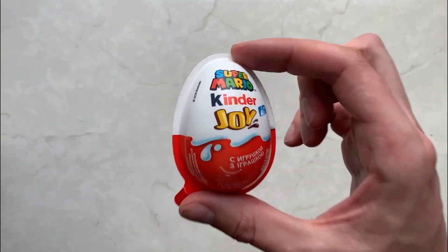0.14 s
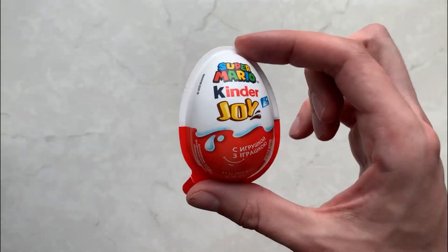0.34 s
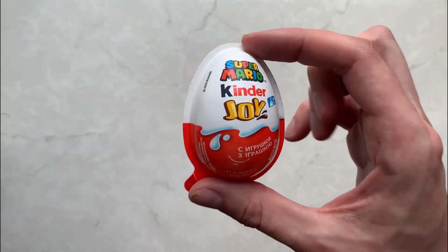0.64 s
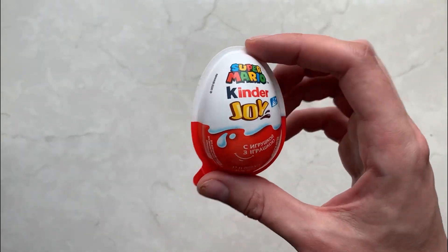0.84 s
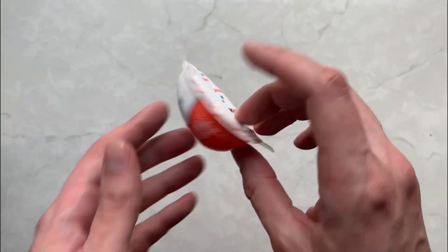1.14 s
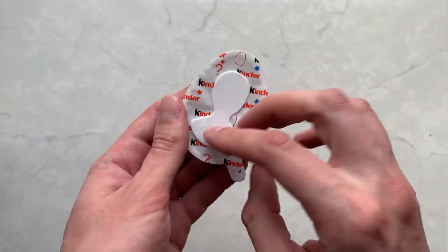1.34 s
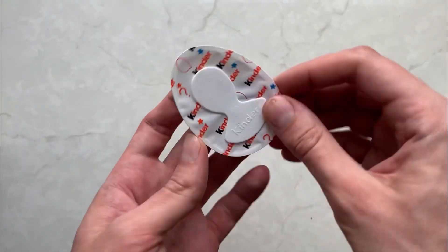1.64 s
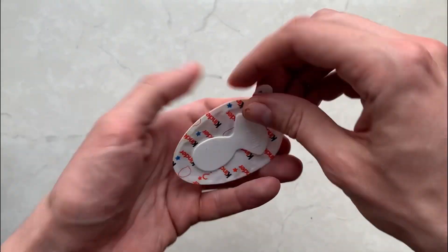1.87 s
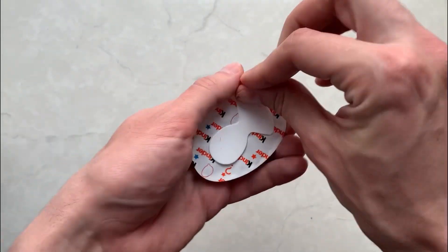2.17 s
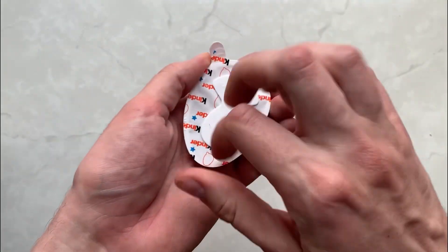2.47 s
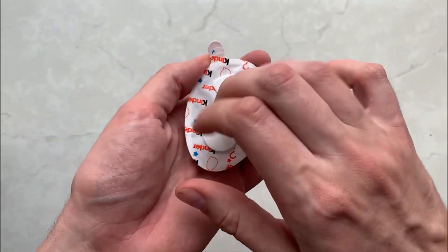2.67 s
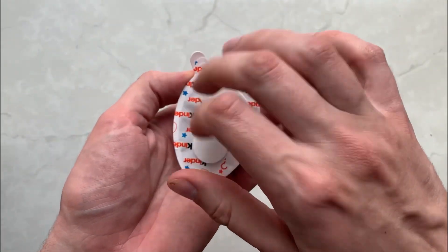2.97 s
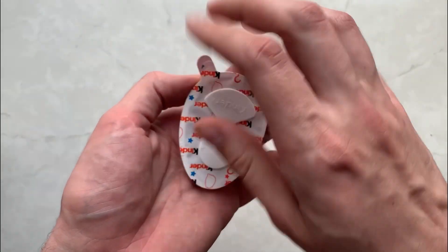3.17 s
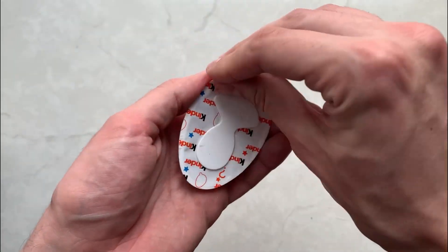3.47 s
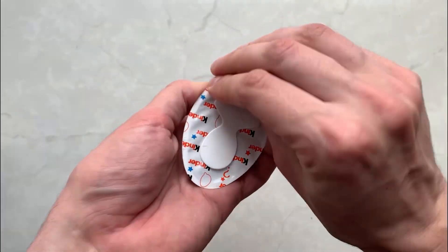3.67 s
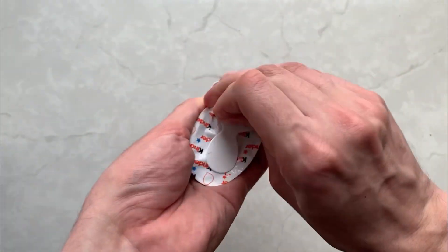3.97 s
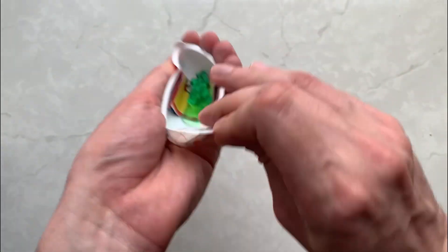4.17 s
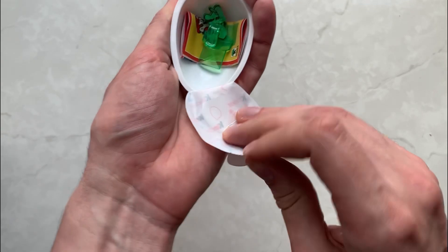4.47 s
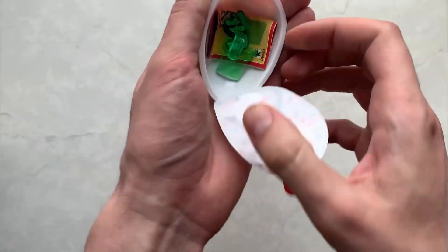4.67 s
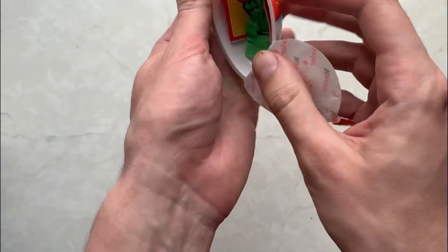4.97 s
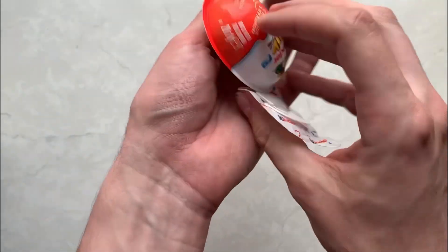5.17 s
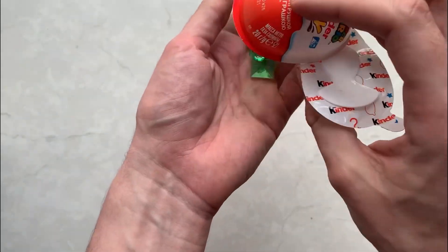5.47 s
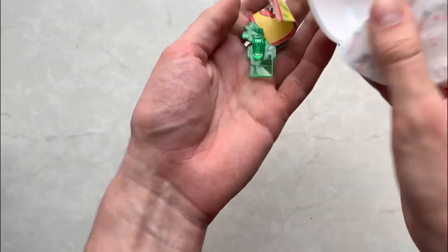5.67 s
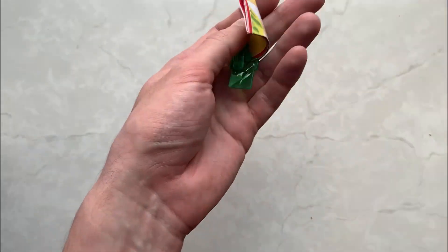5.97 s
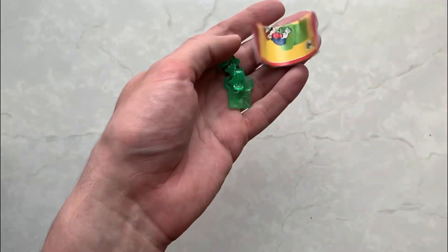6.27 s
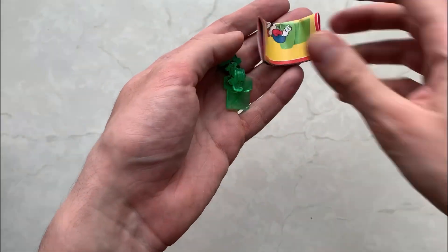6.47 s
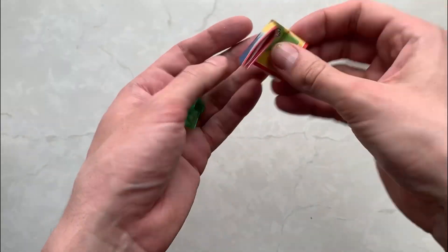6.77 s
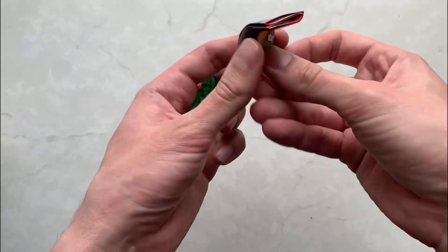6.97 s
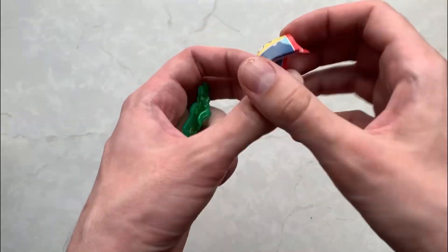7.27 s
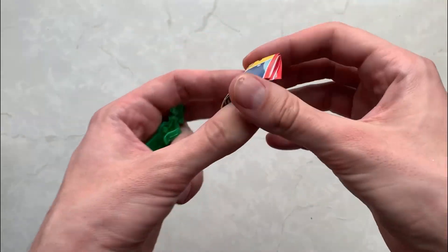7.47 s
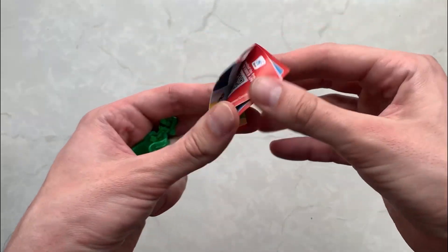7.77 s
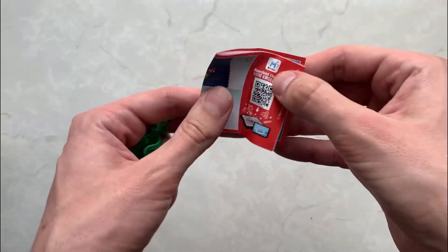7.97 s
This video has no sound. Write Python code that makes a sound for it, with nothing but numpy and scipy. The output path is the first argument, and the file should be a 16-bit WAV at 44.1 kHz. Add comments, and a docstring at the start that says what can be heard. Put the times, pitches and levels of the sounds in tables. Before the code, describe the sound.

Hands tap and flex a small hollow plastic capsule, snap its foil lid open in a sharp crackling burst, then rustle a small folded paper.

```python
"""Opening an egg capsule

Two hands turn a thin plastic egg capsule over a table, peel its foil lid off and tip out a folded leaflet.
The shell buckles with snaps that ring in its hollow, its wall and the foil.
Fingers rub with many tiny slips, and the paper ticks and rustles through its own resonances.
A close pair of microphones hears it in a small quiet room, over a steady background."""
import sys
import numpy as np
from scipy import signal
from scipy.fft import rfft, irfft, next_fast_len
from scipy.io import wavfile

SR = 44100
rng = np.random.default_rng(int(sys.argv[2]) if len(sys.argv) > 2 else 0)


def transcribe(signal):
    """Save signal, clipped to [-1, 1], as a 16-bit WAV file at the path in sys.argv[1]."""
    frames = np.atleast_2d(signal).T
    limited = np.clip(frames, -1, 1)
    pcm = np.round(limited * 32767).astype(np.int16)
    wavfile.write(sys.argv[1], SR, pcm)


N = 358091
TIME = np.arange(N) / SR   # seconds

# Levels in these tables are relative: the parts that use them add their own trims.
# Hollow-sounding knocks on the egg, some as the lid comes off.
# Each row: time in seconds, hollow level in dB, wall level in dB.
KNOCK_EVENTS = [(0.014, -40, -45), (0.123, -43.5, -56), (0.2117, -33, -50), (0.247, -44, -56),
                (0.275, -39.5, -51), (0.36, -28.5, -49.5), (0.452, -48.5, -61.5), (0.578, -34, -40.5),
                (0.6777, -49.5, -56.5), (1.1979, -56, -49), (1.9487, -53, -53), (2.0362, -41, -49),
                (2.6117, -39, -43.5), (2.698, -46, -46.5), (2.7895, -41.5, -44), (2.8724, -45.5, -47.5),
                (3.009, -38, -53), (3.866, -45.5, -58), (3.908, -25.5, -38), (4.112, -28, -25.5)]
# The wall buckles or the seal gives way. Each row: time in seconds, wall level in dB, crack level in dB.
SNAP_EVENTS = [(.192, -53, -64.5), (.241, -55, -48), (.258, -51, -50.5), (1.0525, -52, -64.5),
               (1.12, -53, -63), (1.2112, -63, -55), (1.3407, -43.5, -37.5), (1.4789, -52, -64),
               (1.4986, -42.5, -55), (1.7048, -40, -43), (1.8478, -36.5, -40), (2.0292, -40, -45.5),
               (2.1437, -40, -55.5), (2.2341, -36, -49.5), (2.2468, -29.5, -42.5), (2.5296, -42, -61),
               (2.923, -55.5, -57.5), (3.2765, -61.5, -58), (3.342, -49.5, -99), (3.4797, -52, -63),
               (3.5513, -29, -43.5), (3.6479, -35, -36), (3.735, -24, -46), (3.8925, -44, -36.5),
               (3.899, -32, -39), (3.9047, -24.5, -18.5), (3.9095, -35.5, -36), (3.916, -39.5, -43),
               (3.949, -30.5, -31.5), (3.9502, -35, -24.5), (4.064, -35.5, -40.5), (4.0976, -26.5, -25),
               (4.129, -33, -41), (4.148, -37.5, -51), (4.1822, -44.5, -40.5), (4.208, -52, -49),
               (4.234, -48.5, -50), (4.2591, -47, -41), (4.2644, -47, -42), (4.2928, -43.5, -32),
               (4.2966, -36, -24), (4.5173, -47, -42), (4.59, -58, -58), (4.6053, -43, -59),
               (4.696, -54, -77), (4.7083, -54.5, -58.5), (4.7689, -50, -52), (4.786, -60, -62),
               (4.8203, -50.5, -71), (4.837, -65, -55.5), (4.889, -52.5, -59), (4.9174, -48.5, -52),
               (5.0546, -41, -61.5), (5.072, -54, -55.5), (5.099, -52.5, -63), (5.149, -57, -65),
               (5.1902, -52.5, -64.5), (5.2474, -51.5, -57.5), (5.2884, -58.5, -77), (5.4099, -46.5, -67),
               (5.6078, -49.5, -55.5)]
# The grip tunes the hollow. Each row: time in seconds, pitch in Hz.
HOLLOW_PITCH = [(.5, 1090), (2.0, 934), (2.55, 983), (3.0, 1075), (3.55, 840), (3.75, 1088)]
# A thumb drags over the closed egg and its hollow sings.
# Each row: start in seconds, length in seconds, hollow level in dB, scratch level in dB.
THUMB_SCRAPES = [(.245, 0.018, -39, -62), (1.165, 0.065, -50.5, -63), (1.26, 0.057, -60, -66)]
# Soft pats of fingers and palm. Each row: time in seconds, level in dB.
HAND_PATS = [(0.246, -50), (1.052, -58.5), (1.195, -50.5), (1.558, -57), (2.615, -49.5), (2.792, -50.5),
             (4.608, -57.5), (5.621, -60.5)]
# Fingers slide on the capsule or pull the foil.
# Each row: start in seconds, length in seconds, body level in dB, hiss level in dB.
FINGER_SLIDES = [(.585, 0.03, -51.5, -63), (1.15, 0.16, -59.5, -60.5), (1.665, 0.021, -54, -58),
                 (2.05, 0.14, -65, -71), (2.77, .04, -49, -65), (3.115, 0.013, -63.5, -59),
                 (3.888, 0.069, -41.5, -35.5), (4.08, 0.058, -45, -41.5), (4.16, 0.18, -54.5, -57),
                 (4.53, 0.42, -58.5, -69), (5.03, 0.046, -55.5, -60)]
# The leaflet slides or bends. Each row: start in seconds, length in seconds, body level in dB, hiss level in dB.
PAPER_RUSTLES = [(5.84, 0.016, -69.5, -70), (5.995, .12, -62, -76.5), (6.178, 0.093, -39.5, -49),
                 (6.28, 0.085, -53.5, -69), (6.37, .18, -59, -83.5), (6.765, 0.038, -62, -58.5),
                 (6.89, 0.17, -59.5, -69), (7.64, 0.13, -60, -66), (7.76, 0.028, -72, -58.5),
                 (7.9, 0.16, -69, -78.5)]
# The leaflet lands, creases and flicks open. Each row: time in seconds, sheet level in dB, crack level in dB.
PAPER_CREASES = [(6.001, -58, -65.5), (6.077, -55, -63.5), (6.1794, -39, -46), (6.1934, -38, -44),
                 (6.258, -40.5, -50.5), (6.5233, -62.5, -56.5), (6.643, -53, -52), (6.723, -63.5, -78.5),
                 (6.858, -63, -71), (6.911, -65, -85), (7.1957, -62, -57), (7.303, -53.5, -52.5),
                 (7.6347, -57.5, -68), (7.6639, -53.5, -73), (7.8214, -47.5, -44.5), (8.0805, -47.5, -71)]
# The hands bump together. Each row: time in seconds, level in dB, pitch in Hz.
HAND_BUMPS = [(7.214, -59, 102)]
# Two leaves of the leaflet rub with a faint squeak. Each row: start in seconds, length in seconds, level in dB.
PAPER_SQUEAKS = [(7.215, 0.021, -52), (7.44, 0.029, -65), (7.73, 0.12, -60.5)]

# Resonances of the capsule wall. Each row: pitch in Hz, width in Hz, strength in dB.
WALL_MODES = [(1149, 77, -3), (1343, 220, 0.5), (1694, 230, -2.5), (1820, 1200, -16), (2536, 150, -7),
              (2650, 160, -13.5), (3320, 330, -3), (4650, 980, -10)]
# A buckling patch of wall. Each row: pitch in Hz, width in Hz, strength in dB.
PATCH_MODES = [(1747, 230, 1.5), (3530, 760, -16)]
# Bright resonances of foil and rim. Each row: pitch in Hz, width in Hz, strength in dB.
FOIL_MODES = [(5970, 810, 1), (8700, 2800, 2.5), (9700, 3000, 2), (11370, 2600, 3), (14100, 5800, -5)]
# Dull resonances of the hand. Each row: pitch in Hz, width in Hz, strength in dB.
HAND_MODES = [(175, 410, -8.5), (394, 12, 1.5), (500, 73, -2.5)]
# Broad resonances of the folded sheet. Each row: pitch in Hz, width in Hz, strength in dB.
SHEET_MODES = [(605, 350, -9), (1050, 280, -3.5), (1510, 310, -2.5), (2140, 430, -1), (3330, 315, -1)]
# Narrow resonances of the pinched fold. Each row: pitch in Hz, width in Hz, strength in dB.
FOLD_MODES = [(1580, 190, -8), (3030, 93, -2.5), (3550, 140, 1.5)]
# Colour of the paper's hiss. Each row: frequency in Hz, relative level in dB per Hz.
PAPER_HISS = [(2000, -16.5), (3800, -4.5), (6800, -5), (16000, -19.5)]
# Colour of the room's background. Each row: frequency in Hz, relative level in dB per Hz.
ROOM_COLOUR = [(25, -8.5), (53, -7.5), (102, -6), (166, -11), (734, -14.5), (962, -11.5), (2410, -25.5),
               (6740, -22), (16000, -38.5)]
# Lead of the left microphone over the right. Each row: frequency in Hz, lead in radians.
LEFT_LEAD = [(1900, 0), (2400, 1.8), (4500, -9.3), (5700, -8.8), (6500, -6.6), (7600, -5.9), (12000, -.2),
             (13000, .3), (15000, 3.1)]

BACKGROUND_DB = -73.5   # before the bass cut
PEEL_FROM_S, PAPER_FROM_S = 3.8, 5.8
LEAD_IN_S = .012   # noise swell before each impact
KNOCK_CRACK_DB = -7   # the foil's tick, relative to the wall
SNAP_HOLLOW_DB = -10   # the hollow's ring, relative to the wall
# flesh is a softer contact than buckling plastic; weak cracks lower these further
KNOCK_CONTACT_HZ, SNAP_CONTACT_HZ = 3050, 5450
SEALED_DETUNE, OPEN_DETUNE = 0.043, .22   # spread of the patch's pitch: the open shell is floppier
TAUT_FOIL_HZ, LOOSE_FOIL_HZ = 10500, 11900   # the lid is duller while it is still sealed down
STROKE_ATTACK_S, STROKE_RELEASE_S = 0.019, 0.019
SLIDE_TICKS_PER_S, SLIDE_TICK_DB = 28, -3   # level relative to the slide
RUSTLE_TICKS_PER_S, RUSTLE_TICK_DB = 12, -8   # level relative to the rustle
PAPER_PAN_DB = -0.9   # left minus right: the leaflet is held a little to the right
CUTOFF_HZ = 15800


def from_db(db):
    """Turn decibels into gain."""
    return 10 ** (np.asarray(db) / 20)


def rms_one(x):
    """Scale to rms 1."""
    return x / np.sqrt(np.mean(x ** 2) + 1e-20)


def unit_energy(x):
    """Scale to an energy of 1 a channel, on average."""
    return rms_one(x) / np.sqrt(x.shape[-1])


def cut(x, hz, kind, order=2):
    """Keep the lows, the highs or a band with a Butterworth filter."""
    edges = np.clip(hz, 10, SR * .45)
    return signal.sosfilt(signal.butter(order, edges, kind, fs=SR, output="sos"), x)


def coloured(x, spectrum):
    """Give a steady sound a spectrum; rms 1."""
    hz, db = np.transpose(spectrum)
    size = next_fast_len(N)
    gain = from_db(np.interp(np.log(np.fft.rfftfreq(size, 1 / SR) + 1), np.log(hz), db))
    return rms_one(irfft(rfft(x, size) * gain, size)[..., :N])


def diffuse(size):
    """Stereo noise that differs between the microphones in the middle range only."""
    mid, side = rng.standard_normal((2, size))
    return mid + .9 * cut(side, [1700, 5600], "band", order=3) * np.array([[1], [-1]])


def drift(rate):
    """Slow chance wandering with a spread of 1; a higher rate in Hz wanders faster."""
    points_per_s = 400
    points = rng.standard_normal(int(points_per_s * N / SR) + 400)
    r = np.exp(-2 * np.pi * rate / points_per_s)
    smooth = rms_one(signal.lfilter([1], [1, -2 * r, r * r], points))
    # start half a second in, once the smoothing has settled
    return np.interp(TIME * points_per_s + 200, np.arange(len(points)), smooth)


def resonate(x, modes, detune=0, vary_db=0):
    """Ring parallel resonances; chance shifts the pitch and strength of each."""
    out = 0
    chances = rng.standard_normal((len(modes), 2))
    for k, ((hz, width, db), (shift, boost)) in enumerate(zip(modes, chances)):
        r = np.exp(-np.pi * width / SR)
        w = 2 * np.pi * hz * np.exp(detune * shift) / SR
        gain = from_db(db + vary_db * boost) * (1 - r * r) / 2
        ring = signal.lfilter([1, 0, -1], [1, -2 * r * np.cos(w), r * r], x)
        out = out + (-1) ** k * gain * ring   # neighbours alternate in sign
    return out


def impact(chatter, chatter_s, swell=0.72, swell_s=0.0051):
    """A short noise swell leads into a sharp click, then a short chatter dies away."""
    t = TIME[:SR // 18] - LEAD_IN_S
    noise = diffuse(len(t)) * from_db(3 * rng.standard_normal(len(t)))
    push = chatter * unit_energy(noise * np.exp(-abs(t) / chatter_s) * (t > 0))
    push += swell * unit_energy(noise * np.exp(-abs(t) / swell_s) * (t < 0))
    push[:, round(LEAD_IN_S * SR)] += 1
    return push


def add(out, s, db, sound):
    """Place an impact; db is its energy spread over a hundredth of a second."""
    at = max(round((s - LEAD_IN_S) * SR), 0)
    part = from_db(db) * np.sqrt(SR / 100) * unit_energy(sound)[:, :N - at]
    out[:, at:at + part.shape[1]] += part


def strokes(rows):
    """Make one gain for each level column: a stroke swells, holds and dies away."""
    gains = 0
    for start, length, *levels_db in rows:
        attack = np.clip((TIME - start) / STROKE_ATTACK_S, 0, 1)
        release = np.exp(-np.clip((TIME - start - length) / STROKE_RELEASE_S, 0, 20))
        gains = gains + np.outer(from_db(levels_db), attack * release)
    return gains


def friction(per_s, spread_db, smooth):
    """Tiny slips of uneven size over a smooth hiss, in clumps as the fingers catch and let go; rms 1."""
    sizes = from_db(spread_db * np.minimum(rng.exponential(1, N), 4)) * rng.choice([-1, 1], N)
    slips = sizes * (rng.random(N) < per_s / SR)
    catching = from_db(6 * np.tanh(drift(28)))
    return rms_one((rms_one(slips) + smooth * diffuse(N)) * catching)


def room_background():
    """Steady noise, shaped to the quiet room's own colour."""
    return from_db(BACKGROUND_DB) * coloured(diffuse(N), ROOM_COLOUR)


def blows():
    """Knocks and snaps drive the same parts in different shares."""
    # each row: time in seconds, hollow, wall and crack levels in dB, contact edge in Hz
    knocks = [(s, hollow, wall, wall + KNOCK_CRACK_DB, KNOCK_CONTACT_HZ) for s, hollow, wall in KNOCK_EVENTS]
    snaps = [(s, wall + SNAP_HOLLOW_DB, wall, crack, SNAP_CONTACT_HZ) for s, wall, crack in SNAP_EVENTS]
    return knocks + snaps


def buckle(s):
    """A patch of wall flips over in one clean step and rings for a few milliseconds."""
    step = impact(chatter=.35, chatter_s=.002, swell=.15)
    detune = SEALED_DETUNE if s < PEEL_FROM_S else OPEN_DETUNE
    return cut(resonate(step, PATCH_MODES, detune=detune), 700, "high")


def capsule(hollow_db=0., wall_db=-4.5, patch_db=-2.0, crack_db=0., hollow_width=235, dulling=0.41,
            thud_db=-52.0, thud_follows=0.44):
    """Each blow cracks at the foil, rings in the wall and swells more slowly in the hollow."""
    out = np.zeros((2, N))
    for s, hollow, wall, crack, contact_hz in blows():
        hz = np.interp(s, *np.transpose(HOLLOW_PITCH))
        push = impact(chatter=0.99, chatter_s=0.011)
        air = resonate(push, [(hz, hollow_width, 0), (630, 70, -7)], detune=0.0047)
        air = resonate(air, [(hz, hollow_width, 0)])   # a second pass makes the ring swell
        add(out, s, hollow + hollow_db, cut(air, 2000, "low"))

        shell = resonate(impact(chatter=.6, chatter_s=.003), WALL_MODES, detune=.02, vary_db=2.5)
        edge = contact_hz * from_db(dulling * min(crack - wall, 0))   # soft contacts miss the upper modes
        add(out, s, wall + wall_db, cut(cut(shell, 1400, "high", order=3), edge, "low", order=3))
        add(out, s, wall + patch_db, buckle(s))

        push = impact(chatter=0.75, chatter_s=0.0022, swell=0.2)
        foil = resonate(push, FOIL_MODES, detune=0.03, vary_db=4)
        foil = cut(foil, TAUT_FOIL_HZ if s < PEEL_FROM_S else LOOSE_FOIL_HZ, "low", order=3)
        add(out, s, crack + crack_db, cut(foil, 5800, "high", order=3))

        # part of the blow passes into the hand that holds the shell; flesh yields, so it grows more slowly
        thud = resonate(impact(chatter=0.75, chatter_s=0.0094), HAND_MODES, detune=0.061)
        add(out, s, thud_follows * max(hollow, wall) + thud_db, cut(thud, [140, 460], "band"))
    return out


def delay_lows(x, hz=800, width_hz=750, count=3):
    """Delay the lows more than the highs, so each attack sweeps briefly downward."""
    r = np.exp(-np.pi * width_hz / SR)
    poles = [1, -2 * r * np.cos(2 * np.pi * hz / SR), r * r]
    return signal.sosfilt([poles[::-1] + poles] * count, x)   # all frequencies keep their strength


def scrapes(sing_hz=1020, sing_width=150):
    """The thumb sticks and slips: scratchy grains on the foil, and a held note in the hollow."""
    hollow, scratch = strokes(THUMB_SCRAPES)
    mode = [(sing_hz, sing_width, 0)]
    note = rms_one(resonate(resonate(diffuse(N), mode), mode))
    grains = resonate(friction(per_s=220, spread_db=4.5, smooth=.15), FOIL_MODES)
    return hollow * note + scratch * rms_one(cut(grains, TAUT_FOIL_HZ, "low"))


def pats():
    """Soft flesh gives a dull, short thud."""
    out = np.zeros((2, N))
    for s, db in HAND_PATS:
        thud = resonate(impact(chatter=0.6, chatter_s=0.0037), HAND_MODES, detune=0.11)
        add(out, s, db, cut(thud, 960, "low"))
    return out


def skin_rub():
    """Dense slips of skin ring the dull hand; rms 1."""
    return rms_one(resonate(friction(per_s=1300, spread_db=6.5, smooth=0.83), HAND_MODES))


def capsule_rubbing(foil_db=-2.5, skin_db=-18.5):
    """Sliding fingers drive the same wall and foil as the snaps, with a little skin."""
    body, hiss = strokes(FINGER_SLIDES)
    slips = friction(per_s=240, spread_db=4.2, smooth=.25)
    wall = resonate(slips, WALL_MODES + [(970, 320, 4.0)])
    wall = rms_one(wall + 0.031 * cut(slips, 6500, "low"))
    taut_foil = cut(rms_one(resonate(slips, FOIL_MODES)), TAUT_FOIL_HZ, "low", order=3)
    # the seal lets go in separate rips
    rips = rms_one(resonate(friction(per_s=260, spread_db=4.5, smooth=.15), FOIL_MODES))
    foil = np.where(TIME < PEEL_FROM_S, taut_foil, rips)
    return body * (wall + from_db(skin_db) * skin_rub()) + hiss * from_db(foil_db) * foil


def catches(rows, per_s, tick_db, modes, spread_db=-1.5, hiss_db=-4.0, count=5):
    """A sliding surface catches at random moments: up to five small ticks, each with a pitch of its own."""
    out = np.zeros((2, N))
    for start, length, body, hiss in rows:
        delays = np.cumsum(rng.exponential(1, count)) / per_s
        for delay, size in zip(delays, rng.standard_normal(count)):
            if delay >= length:
                continue
            tick = resonate(impact(chatter=.5, chatter_s=.002), modes, detune=.12, vary_db=7)
            dry_tick = cut(impact(chatter=.7, chatter_s=.001), [5000, 9000], "band", order=3)
            add(out, start + delay, body + tick_db + spread_db * size, tick)
            add(out, start + delay, hiss + hiss_db + spread_db * size, dry_tick)
    return out


def hand_rumble(rumble_db=-73.0, bump_width=45):
    """The hands shift with a faint low rumble once they hold the leaflet, and bump together."""
    effort = np.clip((TIME - PAPER_FROM_S) * 2, 0, 1)
    rumble = rms_one(cut(cut(diffuse(N), 37, "high"), 230, "low", order=1))
    out = from_db(rumble_db) * effort * rumble
    for s, db, hz in HAND_BUMPS:
        bump = resonate(impact(chatter=0.39, chatter_s=0.0045), [(hz, bump_width, 0)])
        add(out, s, db, cut(bump, 2 * hz, "low"))
    return out


def leaflet_rustle(paper_db=-4.5, paper_hiss_db=-0.5, palm_db=-16.0):
    """Slipping fibres ring the folded sheet and hiss, with a little skin."""
    body, hiss = strokes(PAPER_RUSTLES)
    fibres = friction(per_s=450, spread_db=4.5, smooth=.4)
    bending = 0
    for k, mode in enumerate(SHEET_MODES):   # as the sheet bends, its resonances come and go
        bending = bending + resonate(fibres, [mode]) * from_db(3 * drift(9)) * (-1) ** k
    sheet = from_db(paper_db) * rms_one(bending) + from_db(palm_db) * skin_rub()
    return body * sheet + hiss * from_db(paper_hiss_db) * coloured(fibres, PAPER_HISS)


def leaflet_creases():
    """Creases pop: a papery knock with a dry tick on top."""
    out = np.zeros((2, N))
    for s, sheet, crack in PAPER_CREASES:
        knock = resonate(impact(chatter=1.3, chatter_s=.0035), SHEET_MODES, detune=.08, vary_db=3)
        add(out, s, sheet, cut(knock, 7600, "low"))
        add(out, s, crack, cut(impact(chatter=1.0, chatter_s=0.0016), [4200, 10200], "band"))
    return out


def fold_rubs():
    """Paper dragging on paper rings the pinched fold, whose resonances come and go as it bends."""
    level, = strokes(PAPER_SQUEAKS)
    fibres = friction(per_s=300, spread_db=4.5, smooth=.25)
    squeak = sum(resonate(fibres, [mode]) * from_db(4 * drift(9)) for mode in FOLD_MODES)
    return level * rms_one(squeak)


def room(dry, early_db=-7.5, early_s=0.0099, echo_db=-17.5, echo_s=.0102, tail_db=-13.0,
         low_t60=0.3, high_t60=0.28):
    """Scatter from hands and table, one dull echo, then a short tail that dies sooner in the treble."""
    t = TIME[:SR // 2]
    early = unit_energy(diffuse(len(t)) * np.exp(-t / early_s) * (t > .002))
    echo = cut(np.maximum(1 - abs(t - echo_s) * SR, 0), 2700, "low")
    air = diffuse(len(t)) * np.minimum(t / early_s, 1)
    low = cut(air, 1400, "low", order=1)
    high = 0.58 * (air - low)
    # each t60 is the time in seconds to fall by 60 dB
    tail = unit_energy(low * from_db(-60 * t / low_t60) + high * from_db(-60 * t / high_t60))
    response = from_db(early_db) * early + from_db(echo_db) * echo + from_db(tail_db) * tail
    return dry + signal.fftconvolve(dry, response, axes=1)[:, :N]


def scene():
    """All handling sounds in the room, over its background; the microphones lose the deepest bass."""
    background = room_background()
    shell = delay_lows(capsule()) + scrapes() + pats() + capsule_rubbing()
    shell += catches(FINGER_SLIDES, SLIDE_TICKS_PER_S, SLIDE_TICK_DB, WALL_MODES)
    paper = leaflet_rustle() + leaflet_creases() + fold_rubs()
    paper += catches(PAPER_RUSTLES, RUSTLE_TICKS_PER_S, RUSTLE_TICK_DB, SHEET_MODES)
    pan = from_db(PAPER_PAN_DB * (TIME > PAPER_FROM_S) * np.array([[.5], [-.5]]))
    handling = pan * (shell + paper)
    return cut(room(handling) + hand_rumble() + background, 35, "high", order=3)


def record(dry):
    """The two microphones hear many frequencies a little out of step; the top is cut."""
    size = next_fast_len(N + SR // 10)
    lead = np.interp(np.fft.rfftfreq(size, 1 / SR), *np.transpose(LEFT_LEAD))
    turn = np.exp(.5j * lead * np.array([[1], [-1]]))   # half the lead each way
    heard = irfft(rfft(dry, size) * turn, size)[:, :N]
    return signal.sosfilt(signal.ellip(10, .2, 80, CUTOFF_HZ, fs=SR, output="sos"), heard)


dry = scene()
out = record(dry)
transcribe(out)
```